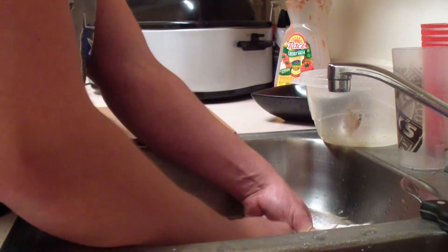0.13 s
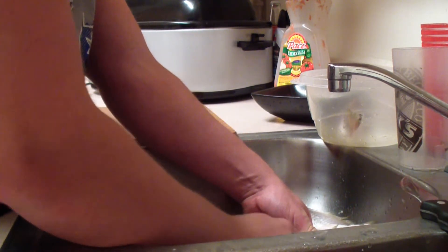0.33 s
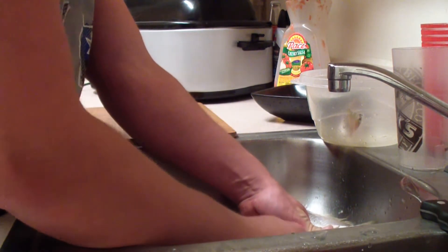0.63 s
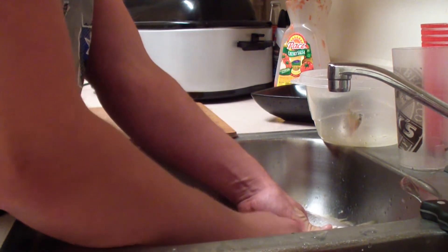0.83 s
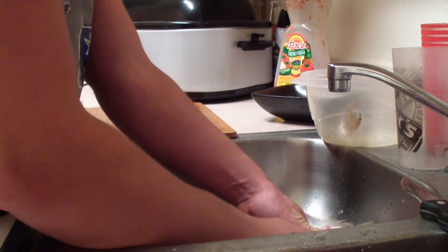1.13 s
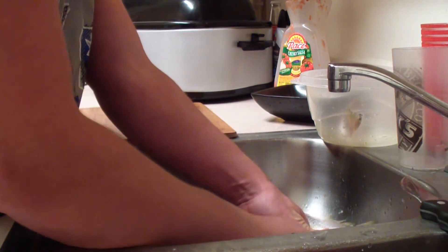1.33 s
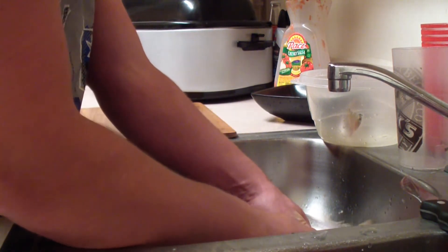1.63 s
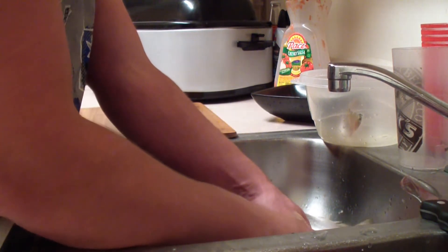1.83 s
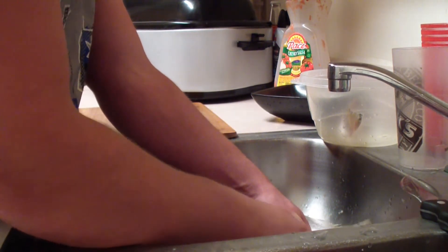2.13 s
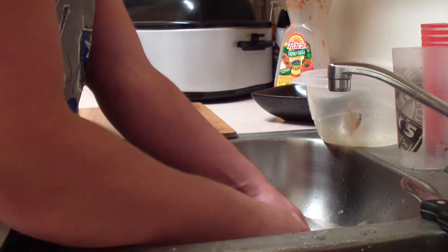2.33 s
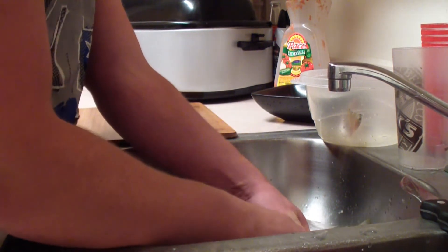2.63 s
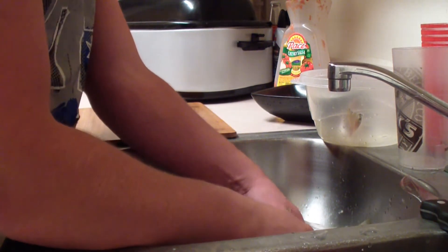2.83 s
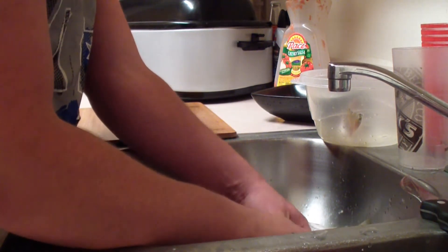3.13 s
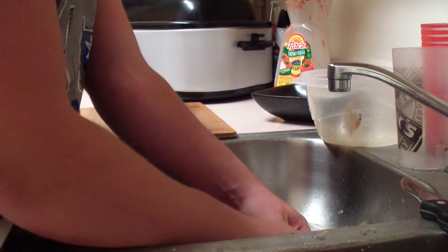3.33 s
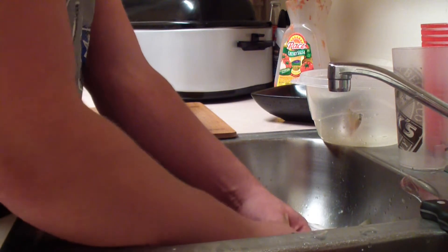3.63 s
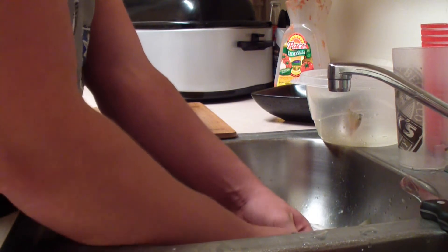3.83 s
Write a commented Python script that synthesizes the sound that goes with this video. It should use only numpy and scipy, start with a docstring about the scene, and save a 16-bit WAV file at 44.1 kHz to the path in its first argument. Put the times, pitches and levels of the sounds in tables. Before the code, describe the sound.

Rapid rhythmic scraping of fish scales, rough and wet, with the basin thumping underneath. It stops briefly past the middle, then resumes somewhat softer. Close stereo pickup, small kitchen, steady low appliance hum.

```python
"""A knife scrapes scales off a fish in a steel sink almost from the start, over a constant low appliance hum
and light handling. Ten to thirteen passes a second, with one pause: dense impulses crackle, rub the wet skin
and rumble the basin. Damped sines thud as the fish is shoved; the blade pings, the basin wall knocks and
wet flesh smacks. Decaying noise echoes set it all in a small kitchen."""
import sys
import numpy as np
from scipy import signal
from scipy.fft import rfft, irfft
from scipy.io import wavfile

SR = 44100
rng = np.random.default_rng(int(sys.argv[2]) if len(sys.argv) > 2 else 0)


def log_audio(samples):
    """Write samples as a 16-bit WAV file to the path given in sys.argv[1]."""
    # one column per channel
    frames = np.atleast_2d(samples).T
    # limit to full scale, then quantise
    limited = np.clip(frames, -1, 1)
    pcm = np.round(limited * 32767).astype(np.int16)
    wavfile.write(sys.argv[1], SR, pcm)


N = 176400
TOP_HZ = 16200


def undb(db):
    """Decibels to gain."""
    return 10 ** (np.asarray(db) / 20)


def gains(points):
    """Gain at every frequency bin, interpolated in log frequency from (Hz, dB) points."""
    hz, db = np.array(points, float).T
    bins_hz = np.arange(N + 1) * SR / (2 * N)
    return undb(np.interp(np.log(bins_hz + 1), np.log(hz), db))


def colour(x, points):
    """Minimum-phase filter of the given colour; keeps the power of white noise."""
    g = gains(points)
    cepstrum = irfft(np.log(g / np.sqrt(np.mean(g ** 2))))
    # fold to the causal half
    cepstrum[1:N] *= 2
    cepstrum[N + 1:] = 0
    response = np.exp(rfft(cepstrum))
    return irfft(rfft(x, 2 * N) * response)[:N]


def ring(x, modes):
    """Damped resonances, together keeping the power of white noise."""
    t = np.arange(SR // 2) / SR
    h = np.zeros(len(t))
    for hz, width_hz, db in modes:
        decay = np.exp(-np.pi * width_hz * t)
        h += undb(db) * np.sqrt(width_hz) * decay * np.sin(2 * np.pi * hz * t)
    return signal.fftconvolve(x, h / np.sqrt(np.sum(h ** 2)))[:N]


# Room air colour. Each row: frequency in Hz, relative density in dB per Hz.
AIR_COLOUR = [(20, -9), (45, 12.5), (80, -8.5), (200, -16.5), (500, -21), (900, -10), (2200, -15),
              (4500, -16.5), (10000, -21.5), (16000, -27)]
# Resonances of the appliance's whirr. Each row: frequency in Hz, width in Hz, relative level in dB.
WHIRR_MODES = [(361, 19, -5.5), (455, 17, -2.5), (535, 16, 0.5), (927, 55, -16)]
HUM_HZ, HUM_DB, WHIRR_DB, AIR_DB = 120.4, -42.5, -59, -50.5


def background():
    """Steady sine hum, noise-driven whirr resonances and soft coloured air noise."""
    hum = np.sin(2 * np.pi * HUM_HZ * np.arange(N) / SR)
    whirr = ring(rng.standard_normal(N), WHIRR_MODES)
    air = colour(rng.standard_normal(N), AIR_COLOUR)
    return undb(HUM_DB) * hum + undb(WHIRR_DB) * whirr + undb(AIR_DB) * air


def grains(rate_per_s, spread_db):
    """Random one-sample impulses of either sign and uneven size, rms 1."""
    hits = rng.random(N) < rate_per_s / SR
    signs = rng.choice([-1, 1], N)
    sizes = undb(spread_db * np.clip(rng.standard_normal(N), -2, 2))
    x = hits * signs * sizes
    return x / np.sqrt(np.mean(x ** 2))


def pops(rate_per_s, decay_s, top_hz):
    """Small bursts that each ring briefly at a random pitch below top_hz, rms 1."""
    t, out = np.arange(int(np.log(1000) * decay_s * SR)) / SR, np.zeros(N + SR)
    decay = np.exp(-t / decay_s)
    for when, pitch, size in rng.random((int(rate_per_s * N / SR), 3)):
        i = int(when * N)
        out[i:i + len(t)] += (size + .5) ** 2 * decay * np.sin(2 * np.pi * pitch * top_hz * t)
    return out[:N] / np.std(out[:N])


def flutter(count=800, spread_db=3):
    """Uneven grip of the blade: a quickly wandering gain, rms 1."""
    places = np.linspace(0, count - 1, N)
    g = undb(spread_db * np.interp(places, np.arange(count), rng.standard_normal(count)))
    return g / np.sqrt(np.mean(g ** 2))


def shifting_ring(x, modes, spread, count=64, order=4):
    """Steel rings in clusters of close modes, redrawn at random in each of count equal time spans."""
    t, out = np.arange(SR // 12) / SR, np.zeros(N + SR)
    hz, width_hz, db = np.repeat(np.array(modes, float), order, axis=0).T[:, :, None]
    decay = np.sqrt(width_hz) * np.exp(-np.pi * width_hz * t)
    for span in np.array_split(np.arange(N), count):
        shift, strength = rng.standard_normal((2, len(hz), 1))
        level = undb(db + 3 * strength)  # 3 dB spread
        waves = np.sin(2 * np.pi * hz * (1 + spread * shift) * t)
        h = np.sum(level * decay * waves, axis=0)
        rung = signal.fftconvolve(x[span], h / np.sqrt(np.sum(h ** 2)))
        out[span[0]:span[0] + len(rung)] += rung
    return out[:N]


# Steady contact of hands and fish. Each row: time in seconds, level in dB before a per-layer offset.
HANDLING_LEVEL = [(0, -34), (1.0, -40), (2.2, -37.5), (2.33, -47.5), (2.5, -42), (2.75, -47.5), (2.95, -56),
                  (3.02, -39.5), (4, -41)]
# Passes of the blade, forward and back. Each row: start in seconds, length in seconds,
# then drive levels in dB of scale crackle, wet rub and basin rumble.
BLADE_PASSES = [(0.08, 0.03, -52, -42.5, -28.5), (0.099, 0.039, -29.5, -45.5, -49),
                (0.174, 0.049, -44.5, -70, -56), (0.294, 0.068, -31.5, -43, -27.5),
                (0.412, 0.04, -43, -46, -36), (0.519, 0.063, -31, -39.5, -29.5),
                (0.657, 0.059, -40, -41, -31.5), (0.756, 0.037, -38.5, -38, -36.5),
                (0.798, 0.031, -30, -50, -50), (0.892, 0.036, -40.5, -44.5, -33),
                (0.984, 0.014, -27, -39.5, -27), (1.019, 0.017, -31, -61, -30),
                (1.114, 0.037, -40.5, -46.5, -35), (1.213, 0.034, -36.5, -36, -28.5),
                (1.237, 0.076, -40.5, -44.5, -47), (1.355, 0.0094, -43.5, -50, -26),
                (1.385, 0.0087, -63, -40, -44), (1.461, 0.054, -36, -49.5, -36),
                (1.56, 0.064, -50, -50, -40.5), (1.669, 0.04, -36.5, -38, -31.5),
                (1.7, 0.047, -41.5, -56.5, -55), (1.781, 0.043, -51, -43, -34.5),
                (1.897, 0.041, -39, -35, -30), (1.931, 0.029, -37, -61, -52),
                (2.018, 0.014, -44, -55, -33.5), (2.123, 0.012, -38, -36.5, -33.5),
                (2.14, 0.066, -45, -53, -59), (2.212, 0.021, -58, -49, -34), (2.971, 0.067, -44, -48, -35),
                (3.134, 0.016, -40, -47.5, -40), (3.23, 0.064, -38.5, -47.5, -38.5),
                (3.323, 0.02, -42.5, -67, -33), (3.435, 0.055, -42.5, -49, -32),
                (3.532, 0.022, -49, -63, -38), (3.63, 0.053, -41, -39.5, -34),
                (3.698, 0.024, -39, -66, -58), (3.75, 0.063, -76, -51, -39.5),
                (3.846, 0.06, -41.5, -39.5, -32.5), (3.944, 0.045, -41, -54, -46.5)]
ATTACK_S = 0.014


def effort(levels_db, release_s, handling_offset_db):
    """Each pass rises, holds and dies away; its power adds to the steady contact of the hands."""
    t = np.arange(N) / SR
    power = undb(np.interp(t, *np.array(HANDLING_LEVEL).T) + handling_offset_db) ** 2
    for (start, length, *_), db in zip(BLADE_PASSES, levels_db):
        rise = np.clip((t - start) / ATTACK_S, 0, 1)
        fall = np.exp(-np.maximum(t - start - length, 0) / release_s)
        power = power + (undb(db) * rise * fall) ** 2
    return np.sqrt(power)


# Colours of the scrape's layers. Each row: frequency in Hz, relative density in dB per Hz.
CRACKLE_COLOUR = [(300, -26.5), (1500, -2.5), (3000, -6), (5000, 3.5), (7000, 4.5), (10000, 5), (13000, 0),
                  (16000, -6)]
RUB_COLOUR = [(150, -12.5), (400, -16), (700, 4), (1100, -7.5), (1400, 2.5), (2100, 6), (3200, 0.5),
              (5000, 11.5), (12000, -107)]
RUMBLE_COLOUR = [(20, -32.5), (40, 7.5), (55, 3.5), (85, 11), (180, 0.5), (250, -11), (400, -14.5),
                 (700, -28.5), (1500, -24), (6000, -33)]
WOOD_COLOUR = [(140, -26.5), (280, 5), (380, 3), (520, 1.5), (750, -2.5), (1100, -10), (2500, -37)]
# Dull, woody part of the scrape. Each row: time in seconds, level relative to the rumble in dB.
WOODY_LEVEL = [(.1, -7), (.5, -11.5), (2.2, -8.5), (3.0, -8), (3.3, -18), (3.7, -2.5)]
# Steel resonances of blade and basin. Each row: frequency in Hz, width in Hz, relative level in dB.
BLADE_MODES = [(4764, 44, 11.5), (5600, 45, 1.5), (6770, 41, 8), (8940, 130, 4.5), (10790, 140, 0)]
BASIN_MODES = [(329, 87, 5), (351, 6.4, 1.5), (468.5, 14.3, -4), (655, 8.3, -5.5), (1130, 64, -1.5),
               (1307, 19, -9), (2068, 39, -2.5)]
BLADE_DB = -4.5
BLADE_SHIFT, BASIN_SHIFT = .022, .045  # relative pitch spread
FINE_PER_S, DRAG_PER_S = 5400, 1300
SCALE_SPREAD_DB, SLIP_SPREAD_DB = 4, 0.5
POP_SHARE, BUBBLE_SHARE = .68, .48  # amplitude shares


def scraping():
    """Scales tear off and ring the blade; the wet skin sticks, squelches and shakes the basin."""
    _, _, crackle_db, rub_db, rumble_db = np.array(BLADE_PASSES).T
    scales = np.sqrt(1 - POP_SHARE ** 2) * grains(FINE_PER_S, SCALE_SPREAD_DB)
    scales = scales + POP_SHARE * pops(1250, decay_s=.0012, top_hz=TOP_HZ)
    scales = scales * flutter() * effort(crackle_db, release_s=0.017, handling_offset_db=-15.5)

    slips = (1 - BUBBLE_SHARE) * grains(FINE_PER_S, SLIP_SPREAD_DB)
    slips = slips + BUBBLE_SHARE * pops(700, decay_s=.006, top_hz=3500)
    slips = slips * effort(rub_db, release_s=0.021, handling_offset_db=-15.5)

    drag = grains(DRAG_PER_S, SLIP_SPREAD_DB)
    drag = drag * effort(rumble_db, release_s=0.0093, handling_offset_db=-6.5)
    woody = drag * undb(np.interp(np.arange(N) / SR, *np.array(WOODY_LEVEL).T))

    blade = undb(BLADE_DB) * shifting_ring(scales, BLADE_MODES, BLADE_SHIFT)
    basin = shifting_ring(slips, BASIN_MODES, BASIN_SHIFT, count=32, order=2)
    crackle, rub = colour(scales, CRACKLE_COLOUR), colour(slips, RUB_COLOUR)
    rumble, wood = colour(drag, RUMBLE_COLOUR), colour(woody, WOOD_COLOUR)
    return crackle + blade + rub + basin + rumble + wood


# The fish is shoved against the basin floor. Each row: start in seconds, level in dB, pitch in Hz.
FLOOR_THUDS = [(0.078, -19, 167), (0.145, -19.5, 120), (.207, -27, 86), (0.353, -14.5, 109),
               (.428, -29, 84.5), (0.459, -25.5, 131), (0.572, -17, 94), (0.676, -16.5, 167.3),
               (.818, -20, 94), (0.916, -20.5, 156), (0.983, -20.5, 140), (1.031, -16.5, 122),
               (1.225, -27.5, 168.5), (1.36, -28, 96), (1.464, -26, 163), (1.684, -25.5, 167),
               (1.917, -21, 160), (2.037, -27, 151), (2.124, -23.5, 145), (3.008, -29, 128),
               (3.024, -21, 121), (3.149, -25.5, 108), (3.257, -16.5, 121), (3.38, -25.5, 129),
               (3.473, -16, 127), (3.558, -22.5, 128), (3.579, -20, 127), (3.686, -19.5, 114),
               (3.755, -27.5, 128), (3.788, -21.5, 131), (3.902, -19, 117.4)]
THUD_RISE_S, THUD_SHAPE, THUD_RING_S, THUD_RING_DB = .011, 3.2, 0.015, -49


def thuds():
    """A soft push swings the basin floor for a few cycles, each thud at its own pitch."""
    age, out = np.arange(SR // 10) / SR, np.zeros(N + SR)
    u = age / THUD_RISE_S
    push = (u * np.exp(1 - u)) ** THUD_SHAPE
    tail = undb(THUD_RING_DB) * np.minimum(u, 1) * np.exp(-age / THUD_RING_S)
    for start, db, hz in FLOOR_THUDS:
        i = int(start * SR)
        out[i:i + len(age)] += undb(db) * (push + tail) * np.sin(2 * np.pi * hz * age)
    return out[:N]


# The fish knocks on the basin wall. Each row: start in seconds, push level in dB.
WALL_KNOCKS = [(.1, -25), (.318, -30.5), (.775, -37.5), (.995, -31), (1.369, -29.5), (2.226, -36.5),
               (2.996, -30.5)]
KNOCK_PUSH_S = 0.001


def knocks():
    """A short, soft push rings the modes of the basin wall."""
    t, pushes = np.arange(N) / SR, np.zeros(N)
    for start, db in WALL_KNOCKS:
        phase = np.clip((t - start) / KNOCK_PUSH_S, 0, 1)
        pushes += undb(db) * np.sin(np.pi * phase) ** 2
    return ring(pushes, BASIN_MODES)


# The blade catches on a scale. Each row: start in seconds, snap drive in dB,
# ping drive in dB before a doubling.
BLADE_CATCHES = [(0.118, -23, -28), (0.1205, -27, -38), (0.2364, -25, -33), (0.3076, -27, -25.5),
                 (0.331, -17, -33), (0.4687, -35, -38.5), (0.53, -41, -32), (0.5436, -21, -29),
                 (0.773, -40, -27), (0.987, -25, -44), (1.0327, -19.5, -57), (1.1063, -23.5, -44),
                 (1.143, -25.5, -37), (1.92, -33, -35), (3.0989, -31.5, -47.5), (3.1493, -37, -49),
                 (3.2521, -22, -26), (3.5306, -28, -46), (3.6385, -51, -44)]
SNAP_DECAY_S, PING_DECAY_S = 0.0023, .005  # of the driving noise


def snaps():
    """Noise bursts give a short crack and a ping of the blade at each catch."""
    t, cracks, pings = np.arange(N) / SR, np.zeros(N), np.zeros(N)
    for start, snap_db, ping_db in BLADE_CATCHES:
        age = np.maximum(t - start, 0)
        cracks += (t >= start) * undb(snap_db) * np.exp(-age / SNAP_DECAY_S)
        pings += (t >= start) * undb(ping_db) * np.exp(-age / PING_DECAY_S)
    crack = colour(cracks * rng.standard_normal(N), CRACKLE_COLOUR)
    ping = 2 * shifting_ring(pings * rng.standard_normal(N), BLADE_MODES, BLADE_SHIFT)
    return crack + ping


# Wet smacks of the fish. Each row: start in seconds, level in dB, centre in Hz, width in Hz.
WET_SMACKS = [(0.988, -29.5, 2000, 400), (1.237, -32.5, 1640, 600), (1.359, -31.5, 1750, 1100),
              (1.373, -32, 1110, 700), (2.033, -35.5, 980, 500), (2.129, -30, 1860, 786),
              (2.219, -34, 1700, 1200), (2.441, -41.5, 2400, 220)]
SMACK_DECAY_S = 0.0088


def smacks():
    """Wet flesh lets go: a decaying noise burst rings one broad, hollow resonance."""
    t, out, noise = np.arange(N) / SR, np.zeros(N), rng.standard_normal(N)
    for start, db, hz, width_hz in WET_SMACKS:
        burst = (t >= start) * np.exp(-np.maximum(t - start, 0) / SMACK_DECAY_S) * noise
        out += undb(db) * ring(burst, [(hz, width_hz, 0)])
    return out


def reflections(x, t60_s):
    """Dense noise echoes that die away, at the power of the source."""
    t = np.arange(SR // 2) / SR
    h = rng.standard_normal(len(t)) * np.exp(-np.log(1000) * t / t60_s)
    return signal.fftconvolve(x, h / np.sqrt(np.sum(h ** 2)))[:N]


# Stereo spread of the scattered sound. Each row: frequency in Hz, side gain in dB.
SIDE_GAIN = [(20, -2), (100, -28), (220, -20.5), (450, -12), (2300, -13), (4500, -8.5), (13000, -1)]
ROOM_T60_S, SCATTER_T60_S, ROOM_DB = 0.22, 0.2, -3.5
WORK_LEFT_OVER_RIGHT_DB = 0.64


def scene():
    """The work in its room; steel walls scatter echoes to both sides with opposite sign."""
    work = scraping() + snaps() + smacks() + knocks()
    work = work + undb(ROOM_DB) * reflections(work, ROOM_T60_S)
    rest = thuds() + background()
    scattered = reflections(work + rest, SCATTER_T60_S)
    side = irfft(rfft(scattered, 2 * N) * gains(SIDE_GAIN))[:N]
    signs = np.array([[1], [-1]])  # left, right
    return work * undb(signs * WORK_LEFT_OVER_RIGHT_DB / 2) + rest + signs * side


def record(dry):
    """A steep elliptic low-pass cuts the top."""
    low_pass = signal.ellip(10, .1, 80, TOP_HZ, fs=SR, output="sos")  # ripple dB, stopband dB
    return signal.sosfilt(low_pass, dry)


dry = scene()
out = record(dry)
log_audio(out)
```